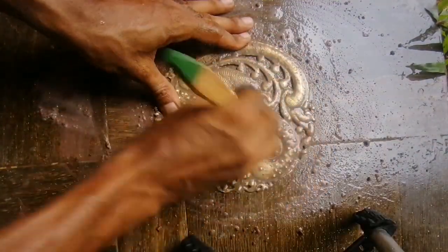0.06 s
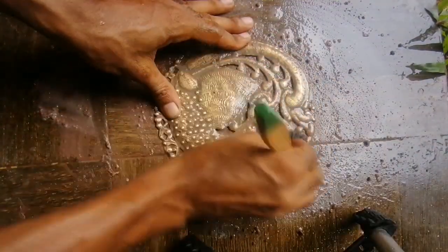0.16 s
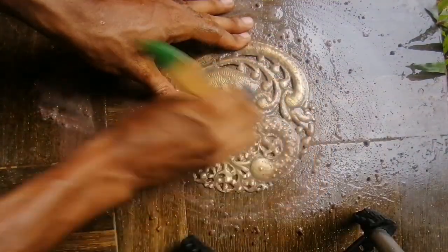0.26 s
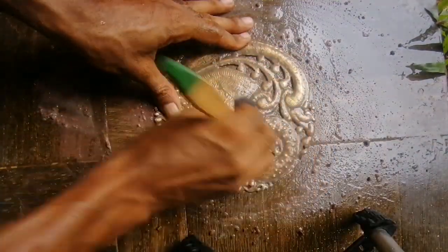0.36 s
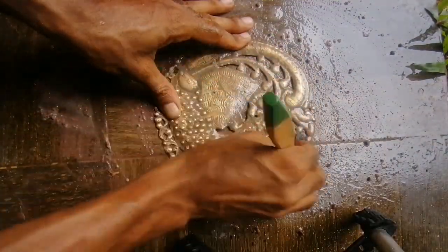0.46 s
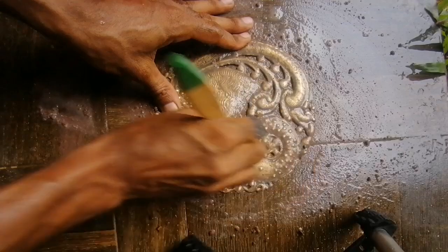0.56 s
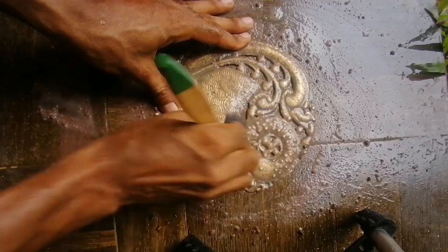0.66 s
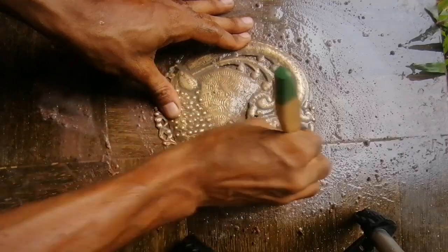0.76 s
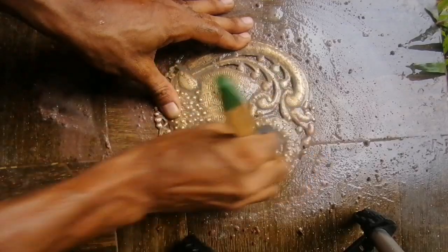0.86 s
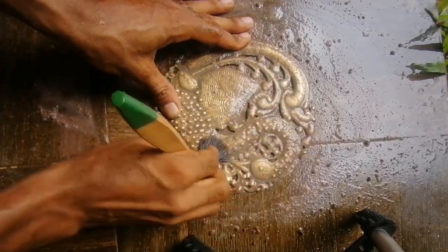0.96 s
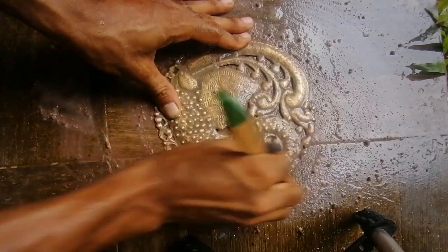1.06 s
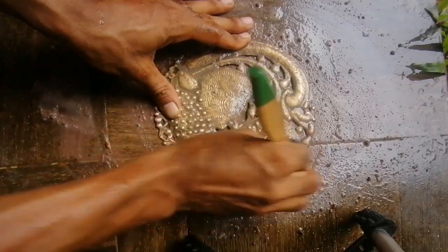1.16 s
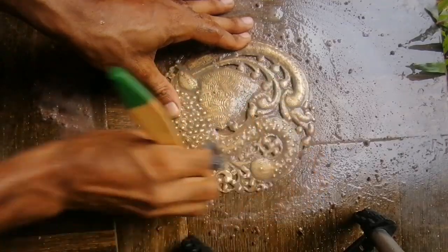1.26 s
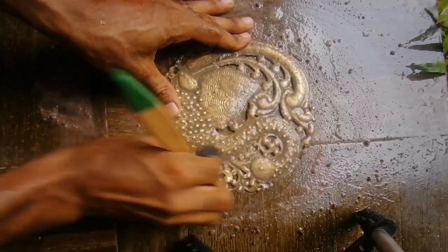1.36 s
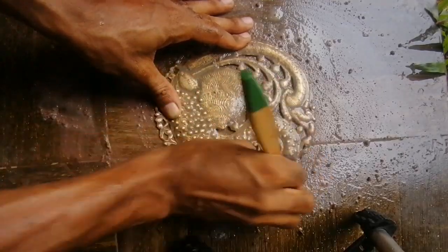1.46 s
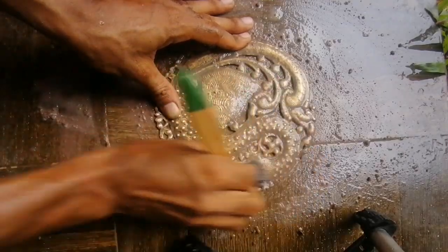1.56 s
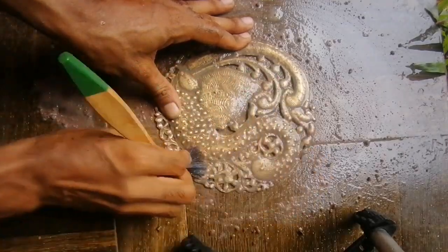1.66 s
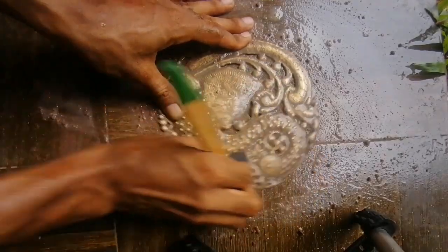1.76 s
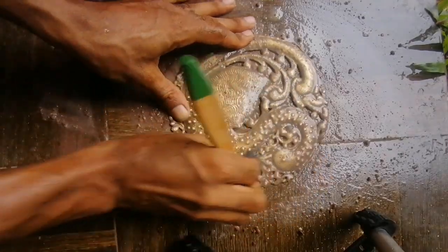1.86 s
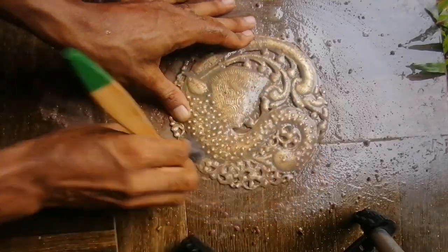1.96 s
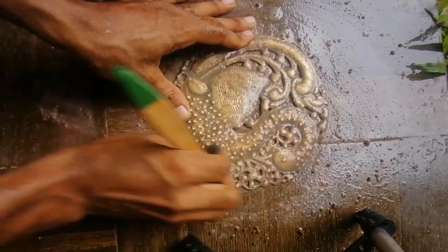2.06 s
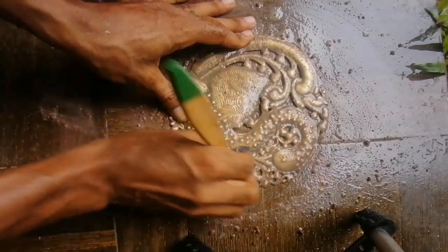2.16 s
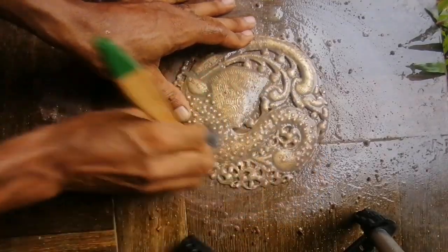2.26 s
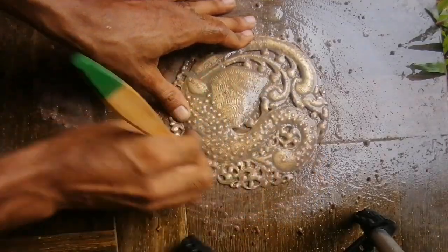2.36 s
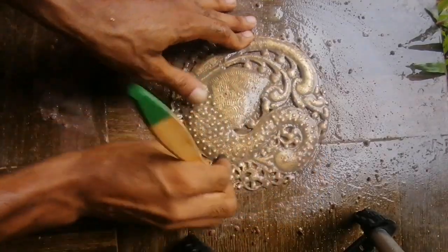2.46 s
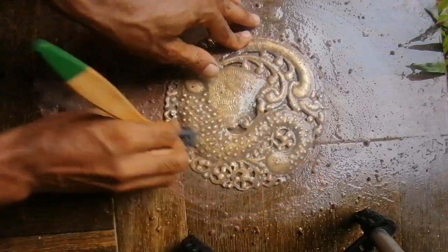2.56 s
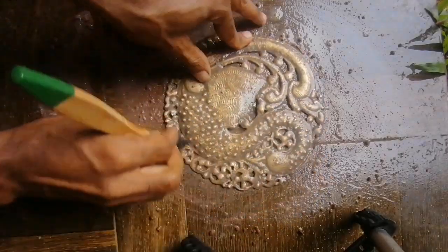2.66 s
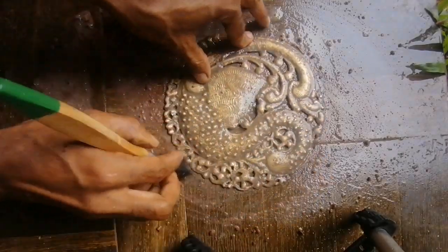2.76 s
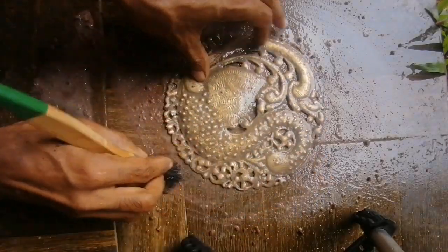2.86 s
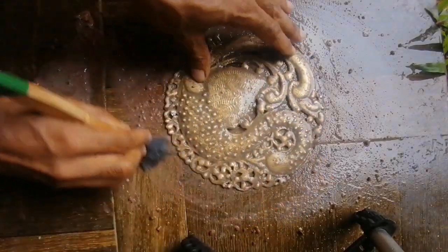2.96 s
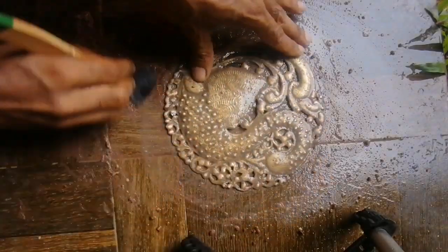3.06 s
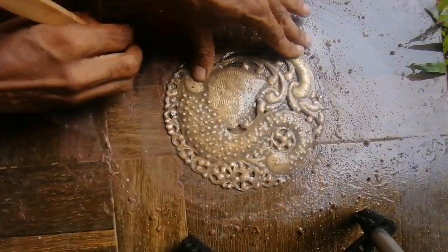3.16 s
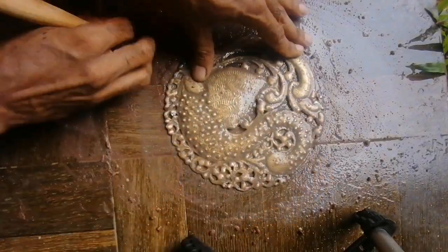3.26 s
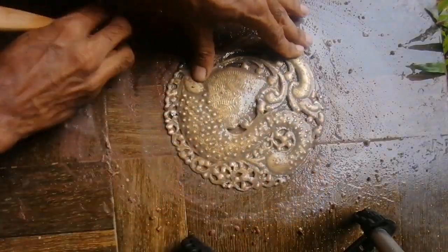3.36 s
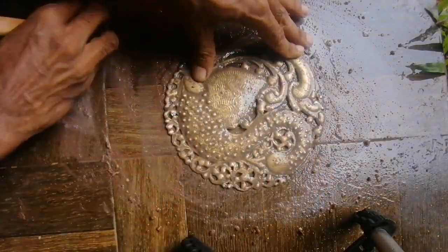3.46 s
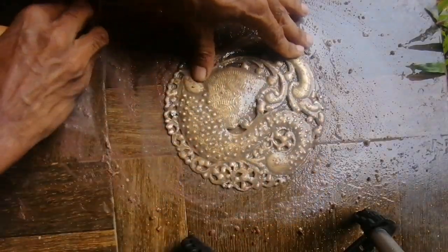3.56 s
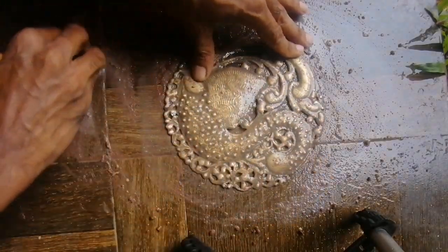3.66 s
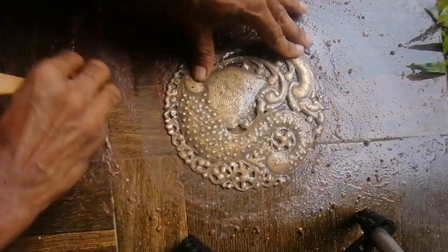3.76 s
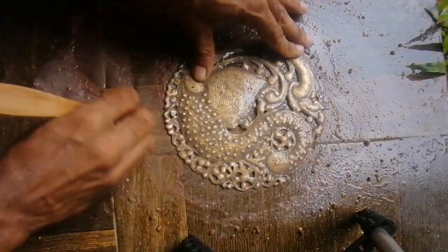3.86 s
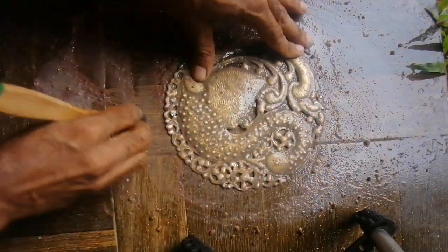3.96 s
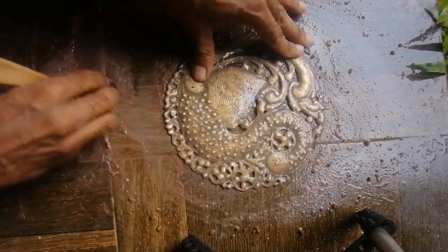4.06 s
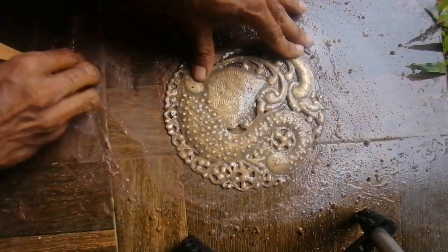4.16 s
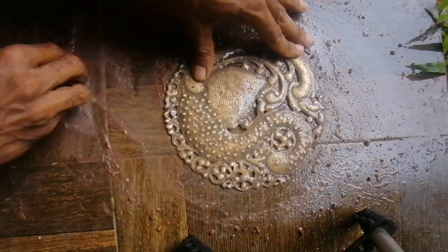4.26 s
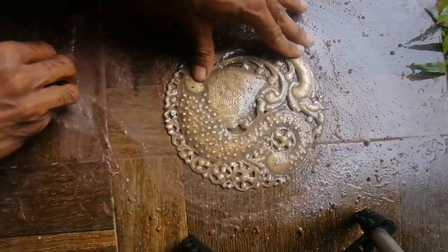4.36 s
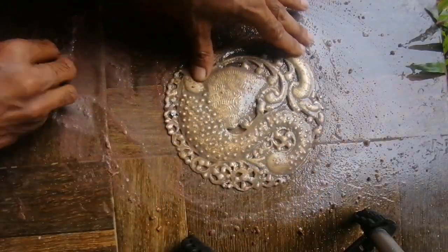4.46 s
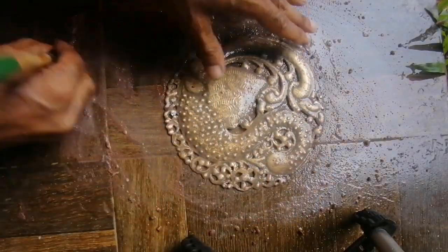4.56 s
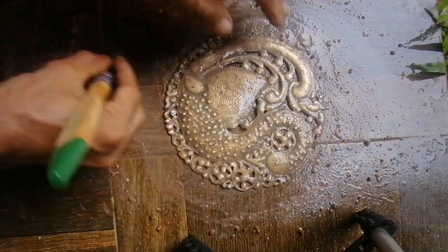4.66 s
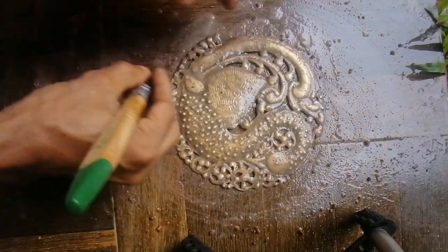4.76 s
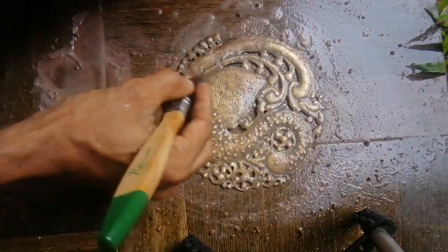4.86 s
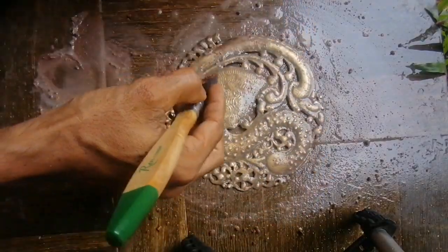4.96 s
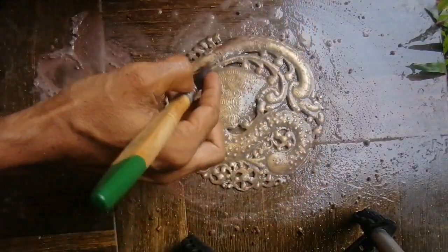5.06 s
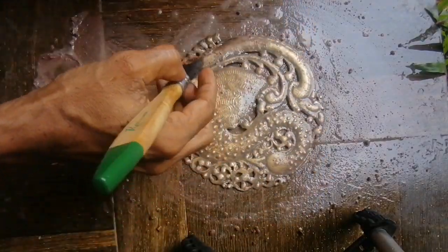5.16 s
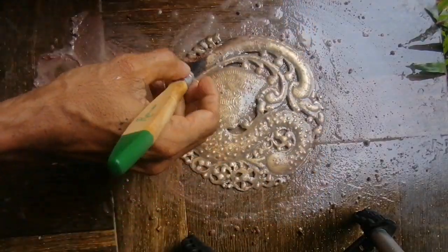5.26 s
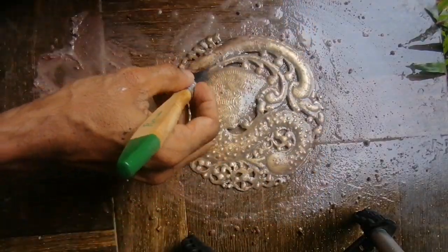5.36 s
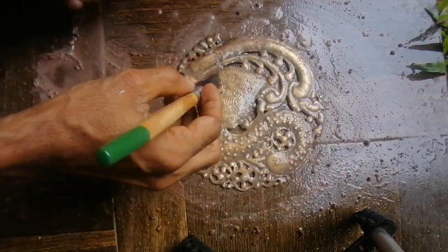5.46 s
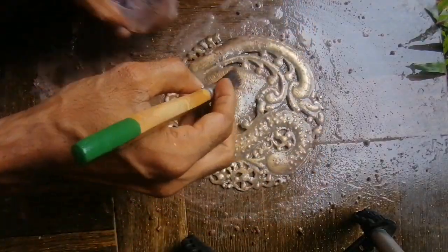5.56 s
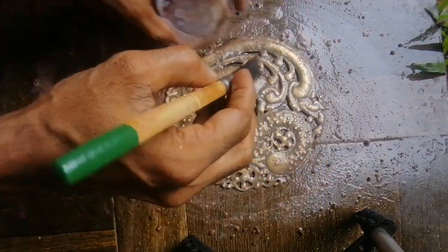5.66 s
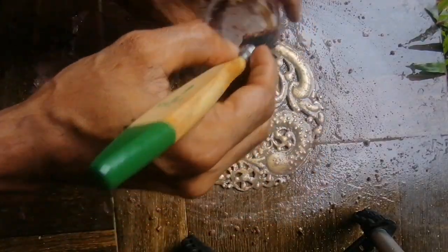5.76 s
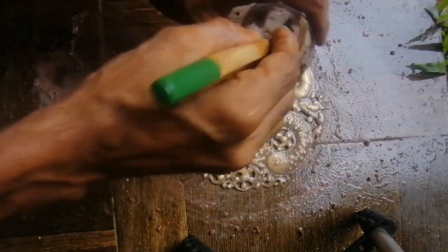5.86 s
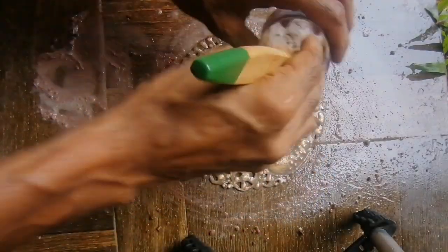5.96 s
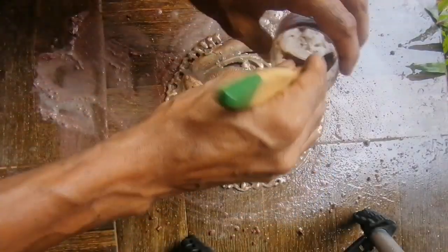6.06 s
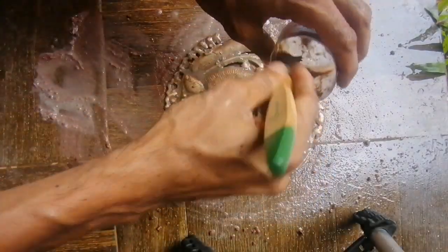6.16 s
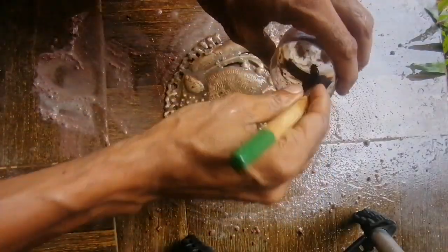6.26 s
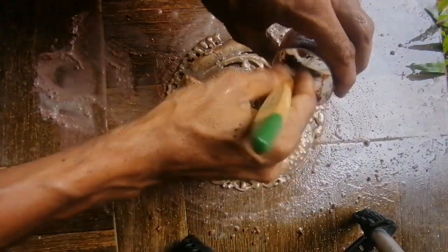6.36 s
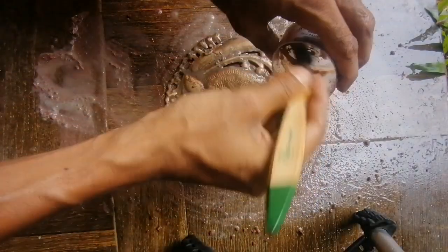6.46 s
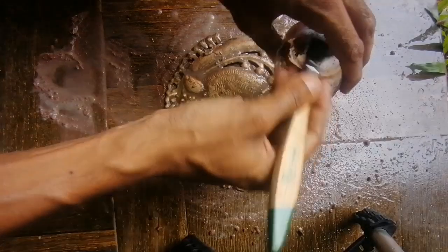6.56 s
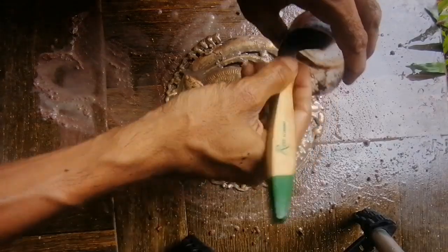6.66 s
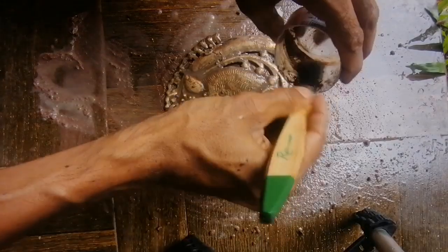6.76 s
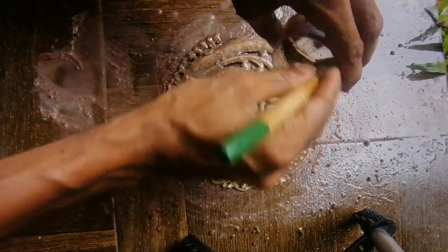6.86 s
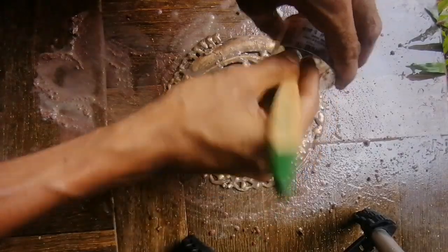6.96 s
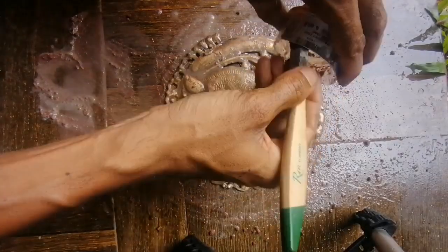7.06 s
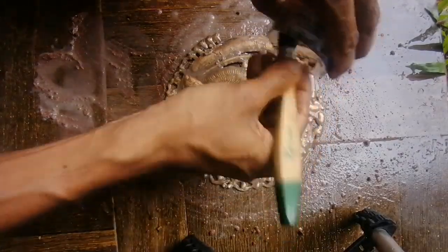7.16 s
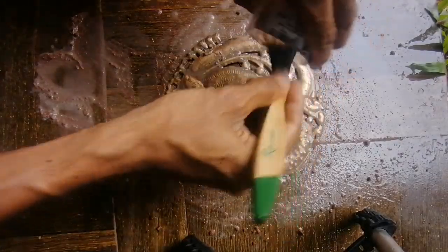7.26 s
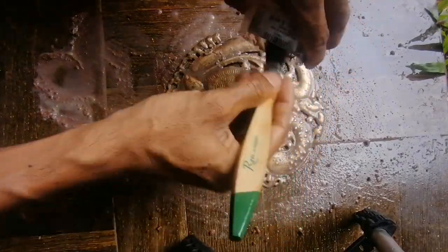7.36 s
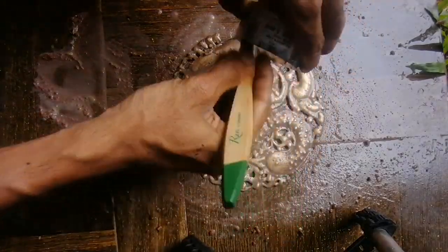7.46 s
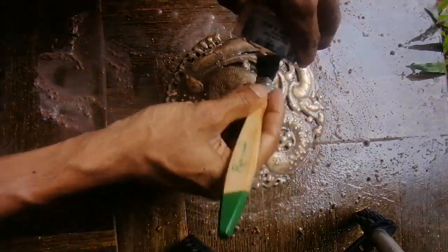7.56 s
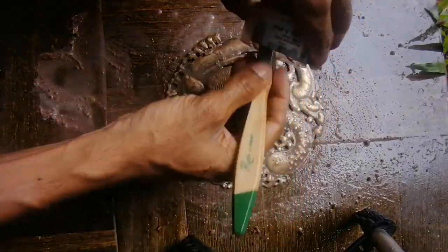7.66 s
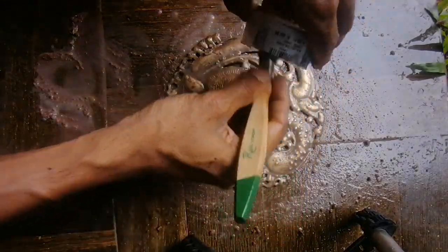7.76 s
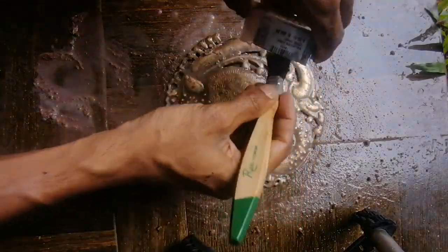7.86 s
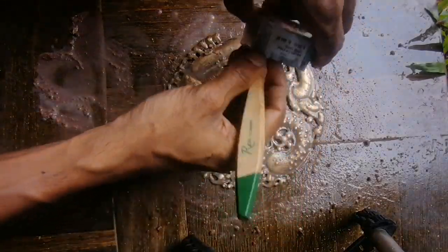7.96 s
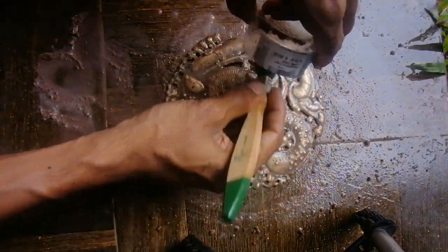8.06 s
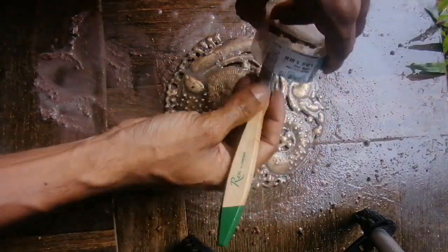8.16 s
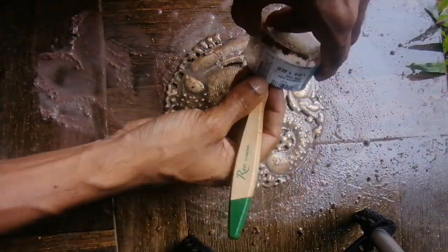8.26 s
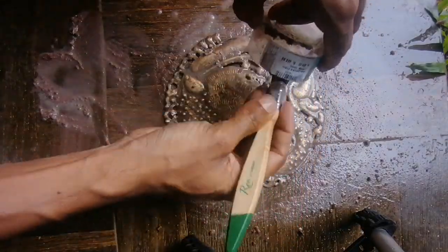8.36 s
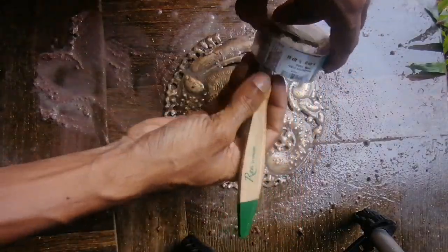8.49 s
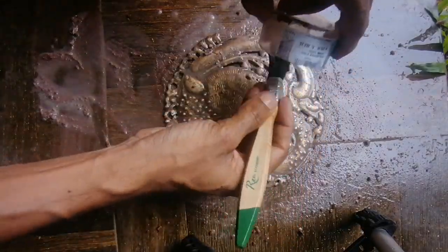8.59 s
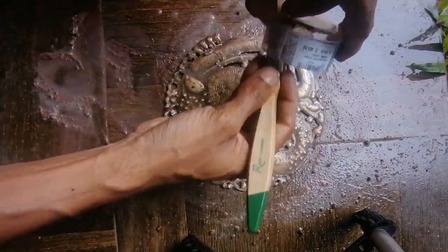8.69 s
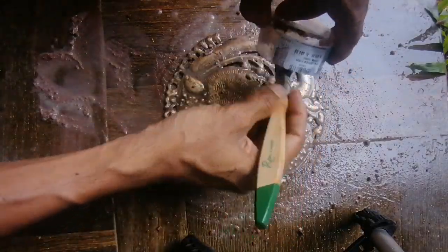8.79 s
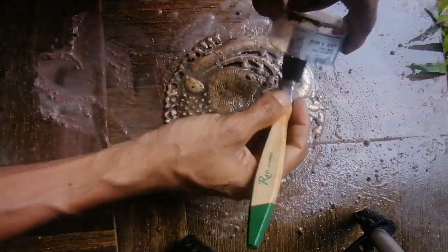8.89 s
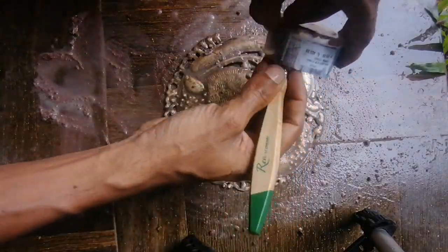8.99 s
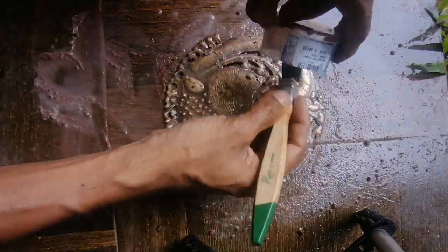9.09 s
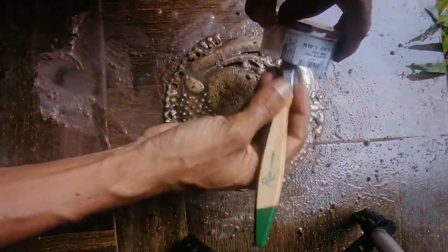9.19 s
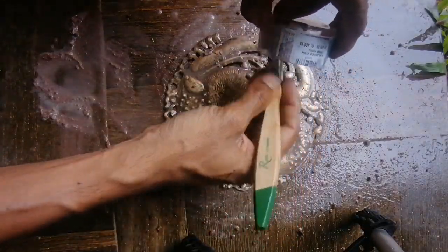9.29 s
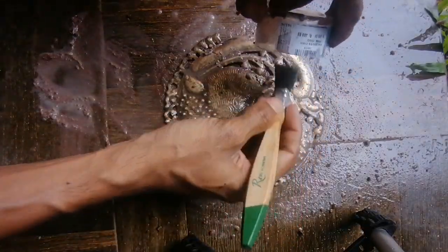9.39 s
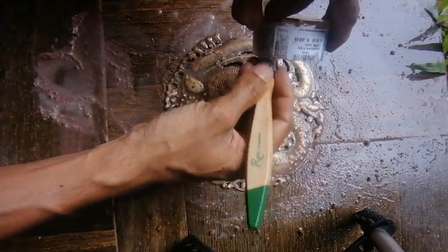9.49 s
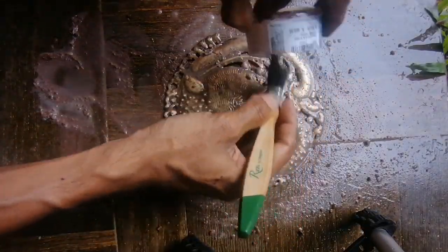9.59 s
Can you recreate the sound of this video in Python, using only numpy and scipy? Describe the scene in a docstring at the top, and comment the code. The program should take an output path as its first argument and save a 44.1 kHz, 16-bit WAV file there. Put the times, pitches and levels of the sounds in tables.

```python
"""A stiff brush scrubs a wet embossed brass plate on a wooden table, hands shuffle, then the brush is worked
round inside a small jar. Stick-slip friction makes the rubbing: contacts let go in bursts that hiss and drive
the resonances of what they rub. Sharp ticks, hollow jar knocks and one low bump are decaying tones; a room
rumbles and hums faintly. Two microphone ports, each with its own treble resonance, colour the hiss."""
import sys
import numpy as np
from scipy import signal
from scipy.io import wavfile
from scipy.ndimage import uniform_filter1d

SR = 44100
rng = np.random.default_rng(int(sys.argv[2]) if len(sys.argv) > 2 else 0)


def store_wav(level_fs):
    """Save 16-bit WAV to argv[1]."""
    pcm = np.round(np.clip(np.atleast_2d(level_fs), -1, 1) * 32767)
    wavfile.write(sys.argv[1], SR, pcm.T.astype(np.int16))


N = 424683


def gain_of(db):
    """Logarithmic level scale: decibels to amplitude."""
    return 10 ** (np.asarray(db) / 20)


def evened(x):
    """Energy normalisation: scales each channel to rms 1."""
    return x / np.sqrt(np.mean(x ** 2, axis=-1, keepdims=True) + 1e-20)


def read(points, hz):
    """Linear interpolation of a table along a log-frequency axis."""
    f, value = np.transpose(points)
    return np.interp(np.log(hz + 1), np.log(f + 1), value)


def panned(db, pan_db):
    """Power summation: gains of two unrelated sides whose average signal has the level db."""
    share = gain_of(np.array([pan_db / 2, -pan_db / 2]))
    return gain_of(db) * 2 * share / np.sqrt((share ** 2).sum(0))


def wander(corner_hz):
    """Low-passed random fluctuation: a slow noise of rms 1 with the given corner."""
    step = 32  # samples
    steps = rng.standard_normal(N // step + 2)
    smooth = signal.lfilter([1], [1, -np.exp(-2 * np.pi * corner_hz * step / SR)], steps)
    return np.interp(np.arange(N) / step, np.arange(len(steps)), evened(smooth))


def pair(same, count):
    """Partial correlation: two noises that share the part same."""
    a, b = rng.standard_normal((2, count), dtype=np.float32)
    same = np.clip(same, -1, 1)
    return np.array([a, same * a + np.sqrt(1 - same ** 2) * b])


def pressure():
    """Friction grows with contact pressure: each stroke is an arch, and the strongest sets colour and side."""
    # strokes of brush and hands: (peak time [s], rise [s], fall [s], rubbing hiss [dB],
    # flatness [.5 pointed to 6 square], deep ring over the hiss [dB], upper ring over the hiss [dB],
    # left minus right [dB])
    strokes = [(.045, 0.046, 0.072, -38.5, 4, -6.5, -2, -0.5),
               (0.211, 0.087, 0.06, -38.5, 2.8, -5.5, -7, -3),
               (.36, 0.077, 0.061, -40.5, 2.5, -4.5, -4.5, -2), (.51, 0.084, 0.088, -41.5, 2, -6, -7.5, -1),
               (0.659, 0.059, 0.1, -43, 2.6, -4.5, -4, -3), (.82, 0.048, 0.13, -43, 2.5, -9, -5.5, -3),
               (1.03, 0.09, 0.066, -41, 4.2, -9, -5.5, 2), (1.18, 0.086, 0.087, -41.5, 4.3, -9.5, -6, 4),
               (1.37, 0.086, 0.075, -41.5, 3.2, -8.5, -6, 2.5),
               (1.53, 0.072, 0.099, -42.5, 5.7, -11, -5.5, 1.5),
               (1.72, 0.066, 0.1, -37.5, 1.46, -10, -7.5, 3.5), (1.91, 0.11, 0.18, -39, 1.9, -8, -5, -0.5),
               (2.08, 0.13, 0.047, -39.5, 1.4, -9.5, -9.5, 2.5),
               (2.271, 0.21, 0.057, -48, 1.06, -0.5, -5.5, -2),
               (2.38, 0.049, 0.047, -38, 2.8, -4, -6.5, -5.5), (2.45, 0.3, 0.17, -50, 2.5, -4, -7, -1.5),
               (2.675, 0.096, 0.08, -41, 1.07, -8.5, -7, -2), (2.95, 0.13, 0.16, -58, 0.68, -11, -10, 0),
               (3.098, 0.09, 0.18, -46.5, 1.6, -8, -9, 0.5), (3.43, 0.19, 0.3, -56.5, 0.93, -24, -11, -4),
               (3.78, 0.31, 0.12, -53, 1.55, -27, -14, 0), (4.3, 0.26, 0.34, -58.5, 4.2, -29, -11, 1),
               (4.7, 0.36, 0.46, -61.5, 2.1, -8.5, -12.5, -6.5),
               (4.97, 0.2, 0.23, -55, 1.7, -19, -8.5, -9.5), (5.35, 0.046, .07, -60, 1.3, -13, 0, 2),
               (5.98, 0.04, 0.095, -63, 1.8, -18, -15, 1), (6.21, 0.12, 0.11, -43, 4.6, -25, -28, -9.5),
               (6.52, 0.17, 0.17, -44.5, 0.99, -18.5, -12, -5),
               (6.84, 0.041, 0.12, -35.5, 1.23, -36, -30, -7),
               (7.1, 0.41, 0.18, -41.5, 0.6, -20, -14.5, -4), (7.38, 0.11, 0.09, -39.5, 4.8, -26, -26, -6),
               (7.598, 0.099, 0.085, -40.5, 1.76, -25.5, -21, -2.5),
               (7.88, 0.091, 0.086, -42.5, 2.8, -19, -24, -2.5),
               (8.12, 0.046, 0.044, -40.5, 0.71, -21, -14, -0.5),
               (8.3, 0.022, 0.035, -44, 1.25, -20, -17, -4), (8.4, 0.078, 0.023, -43.5, 1, -29, -21, 0),
               (8.556, 0.021, 0.033, -47, 1.15, -13.5, -7, 0.5),
               (8.66, 0.06, 0.051, -40.5, 1.9, -18, -16.5, -0.5),
               (8.86, 0.097, 0.07, -43.5, 5.3, -26, -18.5, -1.5),
               (9.168, 0.071, 0.054, -40, 1.13, -17, -17.5, 4.5),
               (9.37, 0.043, 0.11, -43, 2.6, -16.5, -15, 6.5)]
    # light contact between strokes: (hiss [dB], deep ring over it [dB], upper ring over it [dB],
    # left minus right [dB])
    rest = (-69.5, -26, -10.5, -2)
    edge_db = -15  # level of an arch one rise before and one fall after its peak
    t = np.arange(0, N + 32, 32) / SR
    peak, rise, fall, db, flat = np.transpose(strokes)[:5, :, None]
    away = np.maximum((peak - t) / abs(rise), (t - peak) / abs(fall))
    arches_db = db + edge_db * np.minimum(away, 9) ** np.clip(flat, .5, 6)
    power = gain_of(2 * np.vstack([arches_db, rest[0] + 0 * t]))  # twice the decibels: power
    total = power.sum(0)
    # colour and side are averages weighted by power
    contact = np.vstack([np.array(strokes)[:, 5:], rest[1:]]).T @ power / total
    curves = [10 * np.log10(total), *contact]
    return np.array([np.interp(np.arange(N) / SR, t, curve) for curve in curves])


def slips(per_s, spread_db, fade_s, steady, judder_db):
    """Stick-slip friction: single contacts let go at random over a steady drag that judders."""
    let_go = rng.random(N) < per_s / SR
    size = gain_of(spread_db * np.minimum(rng.exponential(1, N), 2.8)) * let_go
    # filtered both ways, so each burst swells and fades alike
    bursts = signal.filtfilt([1], [1, -np.exp(-1 / (fade_s * SR))], size)
    return evened((steady + evened(bursts)) * gain_of(judder_db * wander(24.0)))


def catches():
    """Release of stored elastic force: tufts snap free; the longer the hold, the softer the edges."""
    # bristle tufts catching on an edge: (time [s], snap [dB], deep ring over the snap [dB],
    # upper ring over the snap [dB], hold [s])
    tufts = [(0.075, -37, 3, 0, 0.0057), (0.239, -38.5, 3, 0, 0.0041), (0.315, -35.5, -2.5, -2.5, 0.013),
             (0.332, -31, -20, -4.5, 0.0041), (0.363, -42.5, 13, 2, 0.0044), (0.371, -41, 10, -4, 0.003),
             (0.4937, -27, -3, -7, 0.0015), (0.58, -43, 4.5, 7.5, 0.0028),
             (0.645, -28.5, -17, -0.5, 0.0036), (0.65, -33.5, -12, -4, 0.0077),
             (0.9177, -23.5, -22, -7.5, 0.0012), (0.986, -37.5, -5, -2, 0.013),
             (1.069, -38.5, -10, -7, 0.0028), (1.495, -34.5, -7, -7, 0.021),
             (1.689, -35.5, -6, -12, 0.0066), (1.708, -31, -5, -5, 0.007), (1.736, -42, 15, 8, 0.0017),
             (1.758, -30.5, 1.5, 2, 0.0036), (1.77, -27, -6, -13, 0.0025),
             (1.8013, -25.5, -11, -16.0, 0.002), (1.84, -30.5, -9, -6, 0.014),
             (1.865, -28, -3.5, -7, 0.018), (1.896, -22.5, -2, -3.5, 0.049),
             (2.067, -28.5, -20, -9, 0.0032), (2.241, -36.5, 2, 0, 0.002), (2.272, -40.5, 6.5, 2.5, 0.01),
             (2.352, -33, 0, -5, 0.003), (2.452, -45, 13, -2, 0.0014), (2.476, -31, 0, -4, 0.0052),
             (2.512, -34, -9, -5, 0.0047), (2.5293, -31.5, -6, -8, 0.025), (2.627, -29, -6, -6, 0.032),
             (2.657, -27, -6, 0.5, 0.0066), (3.1055, -36, -1, -6, 0.0014), (3.155, -39, -12, -6, 0.0015),
             (3.183, -47, 9.5, 7.5, 0.0036), (3.3818, -26.5, -11, -8.5, 0.0033),
             (5.322, -36, -27, -16, 0.00082), (5.337, -47, -23, -13, 0.007), (5.368, -51, -13, -1, 0.006),
             (5.959, -48, -21, -21, 0.0017), (6.192, -51, -27, -25, 0.0044), (6.231, -35, -31, -34, 0.017),
             (6.266, -34.5, -43, -55, 0.0046), (6.727, -47.5, -13, -6.5, 0.038),
             (6.781, -45, -13, -6, 0.08), (6.996, -33, -37, -28, 0.004), (7.048, -36.5, -20, -18, 0.005),
             (7.294, -37.5, -22, -14, 0.042), (7.526, -42.5, -17, -15, 0.016),
             (7.593, -34.5, -26, -25, 0.015), (7.809, -40.5, -16.5, -21, 0.0095),
             (8.031, -46, -15.5, -12, 0.031), (8.164, -38.5, -29, -14.5, 0.0085),
             (8.183, -41, -26, -13, 0.008), (8.245, -50, -21, -15, 0.0056),
             (8.43, -30.5, -27, -13.5, 0.0031), (8.732, -48, -30, -25, 0.005), (8.84, -40, -27, -31, 0.006),
             (8.856, -32, -28, -31, 0.0073), (8.907, -40, -27, -25, 0.016), (8.941, -30, -33, -17, 0.0021),
             (8.949, -33, -44, -6, 0.0051), (9.077, -29, -29, -10.5, 0.024), (9.31, -48, -13, -8, 0.036),
             (9.447, -40.0, -34, -31, 0.009), (9.499, -46.5, -33, -9, 0.0046),
             (9.6143, -42, -15, -10, 0.007)]
    t = np.arange(4410) / SR
    force = np.zeros((3, N + len(t)))  # rows: hiss, deep ring, upper ring
    for s, db, deep_db, upper_db, hold in tufts:
        attack = np.minimum(t / (0.002 + 0.34 * hold), 1)
        release = gain_of(-60 * np.maximum(t - 0.88 * hold, 0) / (0.0096 + 2.0 * hold))
        start = round(s * SR)
        levels = gain_of([[db], [db + deep_db], [db + upper_db]])
        force[:, start:start + len(t)] += levels * attack * release
    return force[:, :N] * gain_of(0.49 * wander(95.0))


def rung(force, span, modes, same, shift_db, slide):
    """Forced modal resonance: friction noise drives each mode; drive and pitch shift as the contact moves."""
    out = np.zeros((2, N))
    for hz, width, db, pan_db in modes:
        fade = 1.5 * np.pi * width / SR  # per sample
        pitch = hz * (1 + slide * wander(2.45)[span])
        turn = np.exp(2j * np.pi * np.cumsum(pitch) / SR)
        shifted = force[span] * gain_of(shift_db * wander(6.8)[span])
        drive = shifted * pair(same, len(turn)) * panned(db, pan_db)[:, None]
        # bring the mode down to 0 Hz, low-pass it with a double pole, turn it back up
        envelope = signal.lfilter([1], np.poly([np.exp(-fade)] * 2), drive / turn)
        ring = (turn * envelope).real * np.sqrt(8 * fade ** 3)
        # little bass radiates: second difference, with gain 1 at the mode
        bent = np.diff(ring, 2, prepend=[[0, 0], [0, 0]])
        out[:, span] += bent / (2 * np.sin(np.pi * hz / SR)) ** 2
    return out / np.linalg.norm(gain_of(np.transpose(modes)[2])) / np.sqrt(1 + same)


def phase(start, end, strokes, snaps, modes, grain, same, shift_db, slide):
    """Friction as common source: one stretch of rubbing gives the hiss before the ports, and the ring."""
    t = np.arange(N) / SR
    db, deep_db, upper_db, pan_db = strokes
    drag = grain * gain_of(db + np.array([0 * t, deep_db, upper_db]))
    hiss, deep, upper = np.hypot(drag, snaps) * (t >= start) * (t < end)
    span = slice(round(start * SR), round(end * SR) + 1024)  # lets the ring run on
    deep_ring = rung(deep, span, modes[0], same, shift_db, slide / 3)
    upper_ring = rung(upper, span, modes[1], same / 2, shift_db, slide)
    return np.array([hiss * panned(0, pan_db) * pair(0, N), deep_ring + upper_ring])


def patchy(x, depth_db):
    """Time-varying spectrum: the colour of the hiss drifts as other bristles and other ridges meet."""
    # brightness of the hiss: (time [s], slope [dB per octave])
    tilt = [(0, 0.5), (2, -0.2), (2.6, -0.5), (3.2, 0), (3.7, -0.5), (4.2, 3.5), (4.6, 3.5), (5.1, -6.5),
            (5.7, -0.5), (6.0, 5.5), (6.3, 1.3), (7, 1), (8.3, 1.5), (8.8, 2.5), (9.2, 0), (9.63, 1)]
    pivot_hz = 7500  # where the slope leaves the level alone
    hz, t, z = signal.stft(x, SR, nperseg=256, noverlap=192)
    patches = rng.standard_normal(z.shape, dtype=np.float32)
    patches = uniform_filter1d(patches, size=6, axis=1)  # across frequency
    patches = uniform_filter1d(patches, size=40, axis=2)  # across time
    octaves = np.log2(np.maximum(hz, 1000) / pivot_hz)
    tilt_db = np.outer(octaves, np.interp(t, *np.transpose(tilt)))
    z = z * gain_of(depth_db * patches / patches.std() + tilt_db)
    return signal.istft(z, nperseg=256, noverlap=192)[1][:, :N]


def coloured(x, points):
    """Minimum-phase filtering: a causal filter of unit energy shaped by a table of level over frequency."""
    log_gain = np.log(gain_of(read(points, abs(np.fft.fftfreq(4096, 1 / SR)))))
    taps = np.fft.ifft(np.exp(np.conj(signal.hilbert(log_gain)))).real[:1024]
    return signal.oaconvolve(x, taps / np.linalg.norm(taps))[:len(x)]


def ports(x):
    """Port resonance: each side hears the treble of the hiss through its own microphone port."""
    # relative response of each port to the hiss: (frequency [Hz], level [dB])
    left_port = [(1000, -32), (3000, -16.5), (4000, -12.5), (5500, -7), (6500, -9.5), (8000, -10),
                 (9000, -2), (9700, 5), (10300, -2), (11000, -6.5), (13500, -14.5), (14900, -12),
                 (15400, -46), (15800, -40)]
    right_port = [(1000, -32), (3000, -17), (4500, -8.5), (5100, -0.5), (6300, 1.5), (7050, 7),
                  (7600, -0.5), (9000, -10), (10500, -12), (13500, -18), (14900, -12.5), (15400, -12),
                  (15800, -38)]
    return np.array([coloured(x[0], left_port), coloured(x[1], right_port)])


def room():
    """Diffuse-field correlation: rumble and air nearly alike on both sides in the bass, and a steady hum."""
    # spectrum of rumble and air: (frequency [Hz], relative density [dB per Hz])
    spectrum = [(20, -3), (31, 14), (42, -4), (65, -2), (120, -5), (150, -11), (200, -11), (300, -21),
                (450, -15), (700, -22.5), (1080, -23), (1260, -25.5), (4000, -30.5), (5200, -48)]
    # slow course of the rumble: (time [s], level [dB])
    course = [(0.0, -57.5), (1.6, -59), (2.7, -58), (4.1, -56.5), (7.08, -58.5), (8.05, -55), (9.63, -56.5)]
    # left-right likeness: (frequency [Hz], correlation [-1 to 1])
    likeness = [(60, 0.97), (200, 0.9), (400, 0.43), (800, -0.039), (1500, -0.24), (4000, 0.13)]
    # hum tones: (centre frequency [Hz], nominal level [dB])
    hum_tones = [(446.8, -85), (500.6, -82), (532.9, -68)]
    pan_db = -5.5  # left minus right
    frames, hz = N // 512 + 5, np.fft.rfftfreq(2048, 1 / SR)
    a, b, c, d = rng.standard_normal((frames, len(hz), 4)).T
    same = np.clip(read(likeness, hz), -1, 1)[:, None]
    left = a + 1j * b
    right = same * left + np.sqrt(1 - same ** 2) * (c + 1j * d)
    z = np.array([left, right]) * gain_of(read(spectrum, hz))[:, None]
    air = evened(signal.istft(z, nperseg=2048, noverlap=1536)[1][:, :N])
    level_db = np.interp(np.arange(N) / SR, *np.transpose(course)) + 0.94 * wander(1.7)
    air = air * gain_of(level_db) * gain_of([[pan_db / 2], [-pan_db / 2]])
    hum = np.zeros(N)
    for f, db in hum_tones:
        level = gain_of(db + 2.2 * wander(2.3)) * np.sqrt(2)
        hum += level * np.sin(2 * np.pi * np.cumsum(f + 1.496 * wander(1.97)) / SR)
    return air + hum * gain_of([[-5.], [3.]])


def ticks():
    """Impact excitation: a brief snap of noise and a close pair of dying tones."""
    # small sharp ticks of handle, nails and grit, each with its own short ring:
    # (time [s], nominal level [dB], main pitch [Hz], 60 dB decay time of the tones [s])
    taps = [(2.9431, -51, 1560, 0.018), (3.071, -39.5, 1670, .025), (3.1075, -31.5, 3400, 0.015),
            (3.1566, -39, 1620, 0.014), (3.2734, -49, 2580, .01), (3.31, -45.5, 3030, .01),
            (3.3483, -45, 2830, 0.024), (3.915, -51, 3300, 0.018), (4.5331, -56.5, 1520, .03),
            (4.6634, -52, 1620, 0.043), (5.3237, -43, 3580, 0.032), (5.3416, -63, 1730, 0.24),
            (5.3717, -44, 3260, .03), (6.9977, -43.5, 3320, 0.033)]
    snap_db, snap_t60 = -3.5, 0.0087  # level of the snap against the tick, decay time in s
    out, t = np.zeros(N), np.arange(8820) / SR
    snaps = rng.standard_normal((len(taps), len(t))) * gain_of(snap_db - 60 * t / snap_t60)
    snaps = uniform_filter1d(snaps, size=4) * 2  # softened, then brought back to level
    for (s, db, hz, t60), snap in zip(taps, snaps):
        tone = np.sin(2 * np.pi * hz * t) + 0.17 * np.sin(2 * np.pi * hz * 0.87 * t)
        shape = gain_of(-60 * t / t60) * np.minimum(t / 0.00086, 1)
        out[round(s * SR):][:len(t)] += gain_of(db) * (shape * tone + snap)
    return out * gain_of([[-2.], [2.1]])


def knocks():
    """Damped modes: hollow jar knocks and one low bump, brief and rough, on three close tones."""
    # hollow jar knocks and one low bump:
    # (time [s], nominal level [dB], middle pitch [Hz], 60 dB decay time [s])
    bumps = [(8.133, -33.5, 910, 0.018), (8.269, -53.5, 314, 0.2), (8.39, -39, 920, 0.021),
             (9.08, -25.5, 936, 0.046), (9.099, -24.5, 880, 0.029)]
    out, t = np.zeros(N), np.arange(4410) / SR
    partials = [(.8, 0.63), (1, 1), (1.17, .55)]  # (pitch ratio, amplitude)
    for s, db, hz, t60 in bumps:
        tone = sum(level * np.sin(2 * np.pi * hz * ratio * t) for ratio, level in partials)
        shape = gain_of(db - 60 * t / t60) * np.minimum(t / 0.0037, 1)
        out[round(s * SR):][:len(t)] += shape * tone
    return out * gain_of([[2.5], [-2.5]])


def echoes(x, t60):
    """Sparse early reflections from table, hands and walls, other ones on each side."""
    t = np.arange(8820) / SR
    taps = rng.standard_normal((2, len(t))) * (rng.random((2, len(t))) < .05)
    taps = taps * gain_of(-60 * t / t60) * (t > .002)
    taps = taps / np.linalg.norm(taps, axis=1, keepdims=True)
    return signal.oaconvolve(x, taps, axes=1)[:, :N]


def scene():
    """Superposition: plate, hands and jar in turn, with ticks, knocks and reflections, in the room."""
    # resonances of each rubbed thing, a list of deep ones and a list of upper ones:
    # (frequency [Hz], width [Hz], relative level [dB], left minus right [dB])
    plate = [
        [(700, 150, -18, 0.), (1000, 300, -10, 3.), (1530, 150, -3, -9.), (1645, 100, 0, -9.)],
        [(2300, 300, -2, -5.), (2650, 300, 0, -4.), (3080, 300, 0, 1.5)],
    ]
    table = [
        [(1030, 250, 0, -11), (1630, 200, 0, -6)],
        [(2590, 780, 1, -8), (3230, 490, 0.66, -6)],
    ]
    jar = [
        [(880, 156, -0.5, 3), (1590, 310, 7.5, -4.5)],
        [(1943, 160, 4.9, -2), (2550, 150, 0.6, -6), (3324, 184, 11.8, -3), (5400, 210, 6.8, 8)],
    ]
    hands_s, jar_s = 3.42, 5.3  # when hands and jar begin
    slide = .04  # rms pitch slide of the upper modes, as a share; the deep ones slide a third of it
    right_lag = 3  # samples: the left port is nearer
    strokes, snaps = pressure(), catches()
    plate_grain = slips(300, 6.5, 0.0004, 4.0, 1.16)
    hands_grain = slips(270, 8.5, .0005, 6.2, 0.25)
    jar_grain = slips(450, 5.7, 0.00032, 3.7, 1.46)
    hiss, ring = (phase(0, hands_s, strokes, snaps, plate, plate_grain, 0.78, 2.54, slide)
                  + phase(hands_s, jar_s, strokes, snaps, table, hands_grain, -0.028, 0.9, slide)
                  + phase(jar_s, N / SR, strokes, snaps, jar, jar_grain, 0.89, 3, slide))
    ring = np.array([ring[0], np.roll(ring[1], right_lag)])
    near = ports(patchy(hiss, depth_db=2.8)) + ring + knocks() + ticks()
    return near + gain_of(-9) * echoes(near, t60=0.06) + room()


def record(dry):
    """Dynamic compression: gain control ducks everything at and after the loudest strokes; then a band limit."""
    threshold_db, duck_share = -37.5, 0.33  # the share of the excess that is taken away
    held_fall = 62  # fall of the held peak level, dB per s
    edge_hz = 15900
    power_db = 10 * np.log10(abs(uniform_filter1d((dry ** 2).mean(0), size=1300)) + 1e-12)
    fall = np.arange(N) * held_fall / SR
    held_db = np.maximum.accumulate(power_db + fall) - fall
    over_db = np.maximum(held_db - threshold_db, 0)
    ducked = dry / gain_of(duck_share * uniform_filter1d(over_db, size=400))
    low_pass = signal.firwin(511, edge_hz, window=("kaiser", 9), fs=SR)
    return signal.oaconvolve(ducked, low_pass[None], "same")


dry = scene()
out = record(dry)
store_wav(out)
```